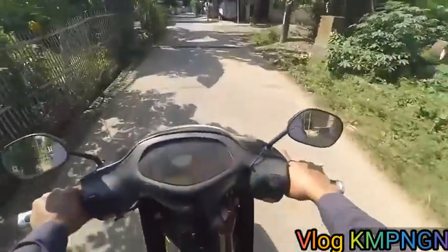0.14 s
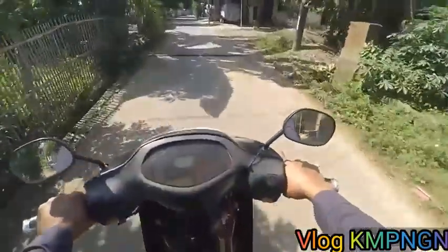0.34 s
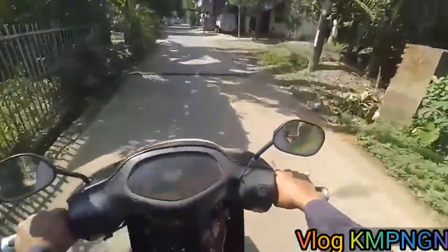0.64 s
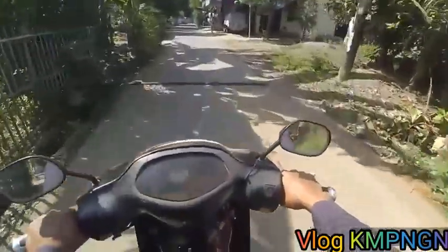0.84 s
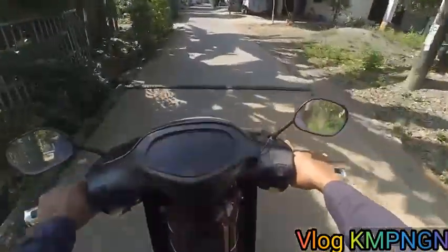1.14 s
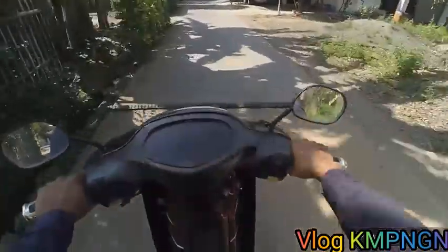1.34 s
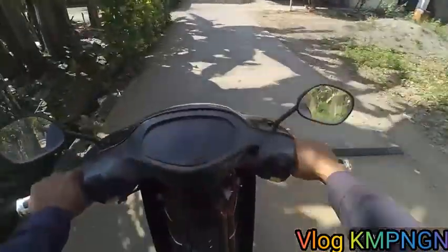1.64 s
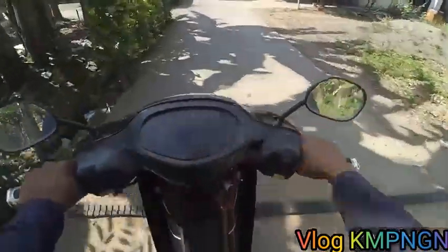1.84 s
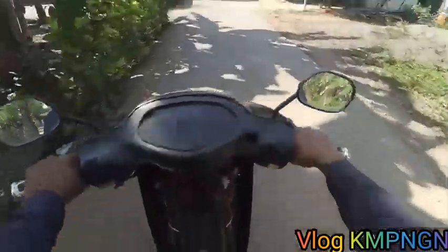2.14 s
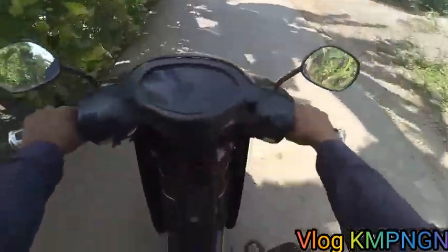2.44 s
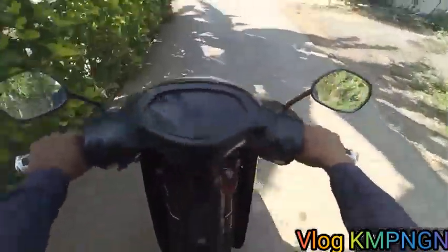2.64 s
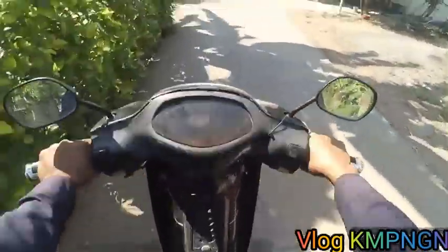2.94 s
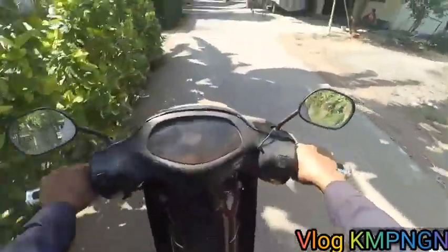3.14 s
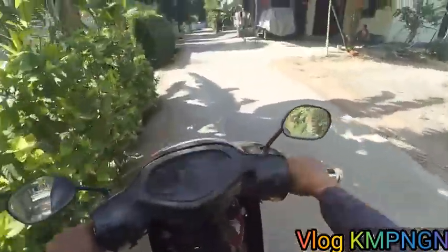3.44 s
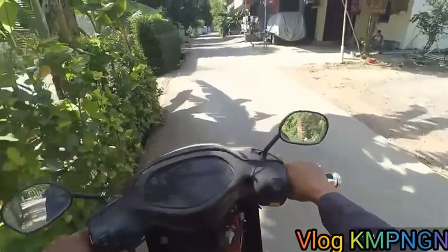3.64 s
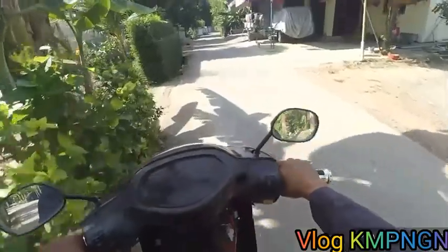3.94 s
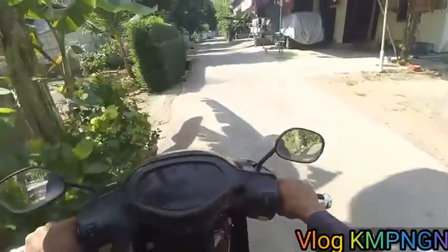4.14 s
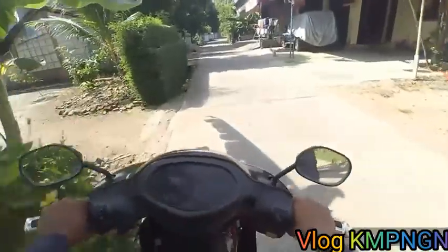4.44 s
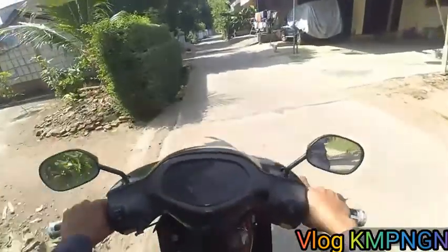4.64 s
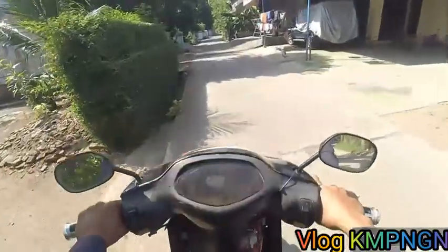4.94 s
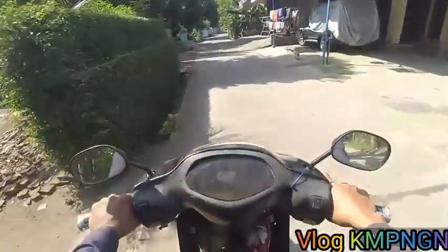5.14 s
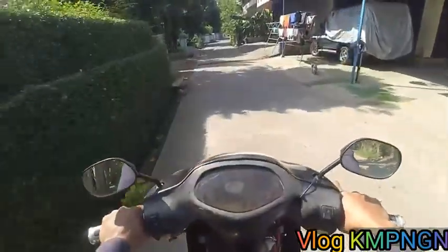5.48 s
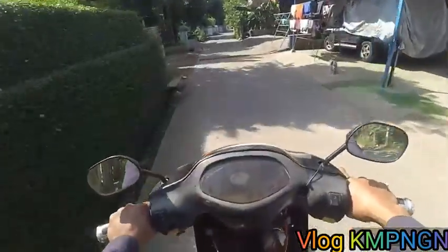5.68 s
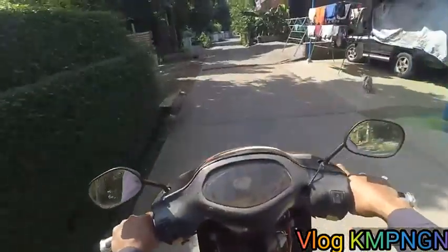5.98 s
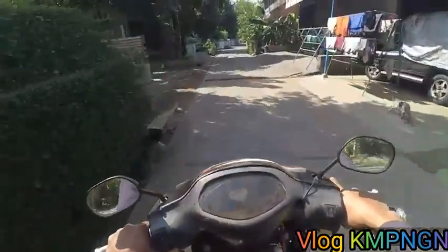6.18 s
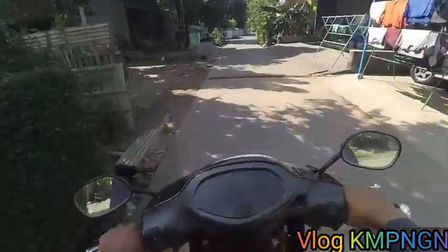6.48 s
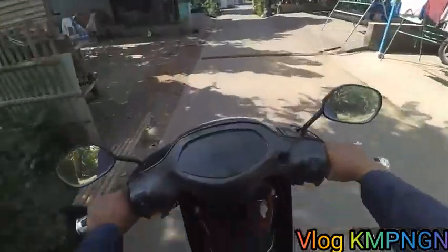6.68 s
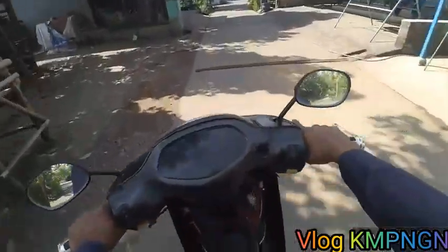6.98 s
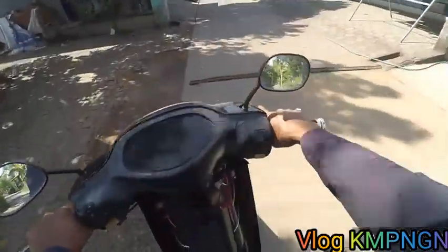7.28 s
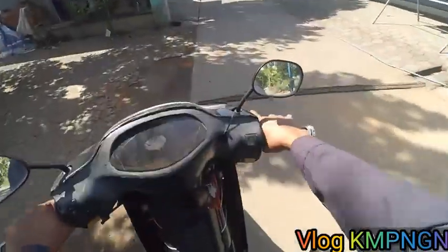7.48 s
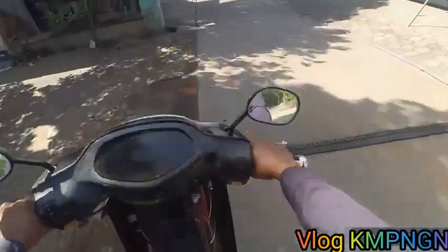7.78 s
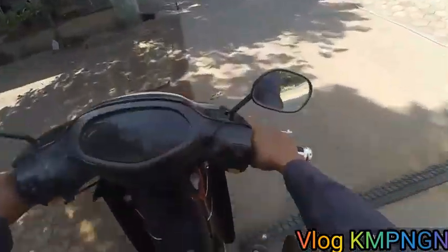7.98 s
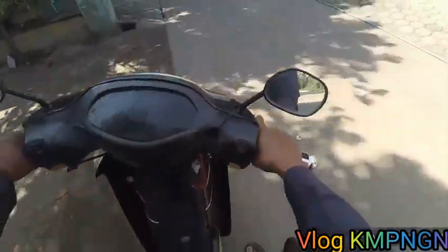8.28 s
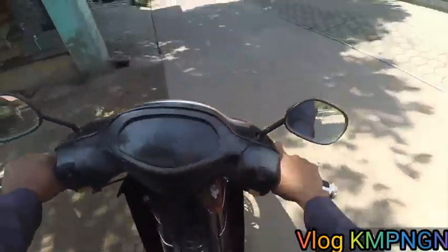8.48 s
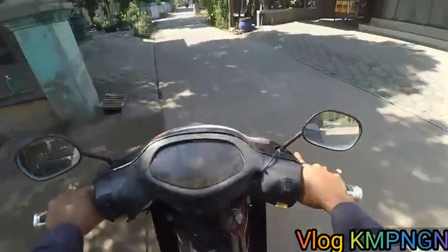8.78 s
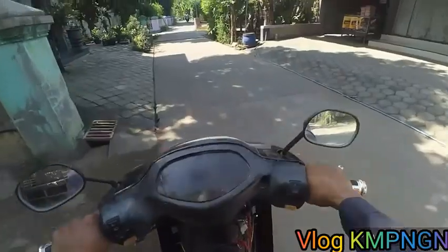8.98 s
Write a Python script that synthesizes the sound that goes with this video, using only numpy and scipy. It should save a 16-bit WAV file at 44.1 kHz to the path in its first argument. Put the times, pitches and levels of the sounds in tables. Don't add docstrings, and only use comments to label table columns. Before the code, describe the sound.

From the rider's chest, a low-speed scooter engine throbs and clatters over tyre hiss, broken by a scrape, a heavy knock and brief chirps.

```python
import sys
import numpy as np
from scipy import signal
from scipy.fft import rfft, irfft, next_fast_len
from scipy.io import wavfile
from scipy.ndimage import uniform_filter1d, map_coordinates

SR = 44100
rng = np.random.default_rng(int(sys.argv[2]) if len(sys.argv) > 2 else 0)


def wrap_up_sound(samples):
    columns = np.atleast_2d(samples).T
    tamed = np.clip(columns, -1, 1)
    steps = np.round(tamed * 32767).astype(np.int16)
    wavfile.write(sys.argv[1], SR, steps)


def invert_db(x):
    u = np.asarray(x, float) / 20
    return 10 ** u


N = 402191

# time_s, firings_per_s
SPEED = [(0.0, 16.1), (0.5, 14.46), (1.0, 11.55), (1.35, 10.5), (1.55, 12.9), (1.83, 20), (2.1, 23.2),
         (2.65, 24.85), (3.6, 24.15), (4.3, 20.7), (4.7, 22.1), (5.05, 20.6), (5.65, 19.75), (6.45, 16.1),
         (7.15, 15.45), (7.52, 14), (8.45, 20.8), (9.12, 21.3)]
# centre_hz, width_hz, level_db
HOUSING = [(990, 86, 3.5), (1249, 83, 3.5), (1559, 56, -3.5), (1785, 22, 1), (2044, 260, -5.5),
           (2387, 105, -1), (2649, 75, 0.5), (3340, 207, -6), (4140, 133, 1), (4760, 205, -11.5),
           (5310, 490, -11.5), (6600, 1780, -16), (9100, 59, -20), (10440, 150, -34)]
# freq_hz, level_db_per_hz
HISS = [(290, -33), (500, -15), (684, -22.5), (1050, -2.5), (1440, -11.5), (2610, -10), (3730, -11.5),
        (4130, -15.5), (4560, -18), (6700, -23), (15100, -45)]


def unit(x):
    return x / np.sqrt(np.mean(x ** 2) + 1e-20)


def curves(rows):
    s, *cols = np.transpose(rows)
    return [np.interp(np.arange(N) / SR, s, c) for c in cols]


def wobble(rate_hz):
    knots = rng.standard_normal(int(N * rate_hz / SR) + 4)
    return map_coordinates(knots, [np.arange(N) * rate_hz / SR])


def filtered(x, response):
    m = next_fast_len(N + SR // 2)
    return irfft(rfft(x, m) * response(np.fft.rfftfreq(m, 1 / SR)), m)[:N]


def resonances(modes):
    def response(f):
        total = 0
        for k, (centre_hz, width_hz, db) in enumerate(modes):
            damping = 1j * f * width_hz
            total = total + (-1) ** k * invert_db(db) * damping / (centre_hz ** 2 - f * f + damping)
        return total
    return response


def colour(points):
    hz, db = np.transpose(points)
    return lambda f: invert_db(np.interp(np.log(f + 1), np.log(hz + 1), db))


def patchy(depth_db):
    z = signal.stft(rng.standard_normal(N), nperseg=512)[2]
    field = uniform_filter1d(rng.standard_normal(z.shape), size=6, axis=0)
    field = uniform_filter1d(field, size=10, axis=1)
    return signal.istft(z * invert_db(depth_db * unit(field)), nperseg=512)[1][:N]


def add(track, s, sound):
    part = track[max(round(s * SR), 0):][:len(sound)]
    part += sound[:len(part)]


def noise_levels():
    # time_s, level_db
    roadside = [(0, -3.5), (.4, -3), (1.2, 0), (1.75, -0.5), (2.5, 1), (4.1, 0.5), (4.9, -0.5), (6, 0.5),
                (7.1, 0), (7.55, -1), (8.2, -0.5), (9.12, -1)]
    cruise_firings_per_s = 20
    faster = curves(SPEED)[0] - cruise_firings_per_s
    walls_db = curves(roadside)[0]
    clatter_db = -44 + 0.63 * faster + walls_db
    air_db = -50 + 0.33 * faster + walls_db
    return clatter_db, air_db


def insects():
    # start_s, end_s, pitch_hz, width_hz, level_db
    buzzes = [
        (0, .4, 7230, 504, -64.5),
        (4.15, 4.8, 8600, 346, -66.5),
        (4.204, 4.9, 6600, 498, -60),
        (4.301, 4.996, 5592, 294, -61),
        (5.897, 6.501, 7553, 495, -66),
        (6.305, 6.606, 7060, 707, -59),
        (6.788, 7.697, 7140, 602, -59),
        (6.802, 7.1, 8700, 300, -70),
        (7.2, 7.694, 6470, 252, -67),
        (8.626, 8.857, 4220, 1906, -47),
    ]
    out, pulsing = np.zeros(N), invert_db(3 * wobble(14) + 2.5 * wobble(45))
    for start, end, hz, width_hz, db in buzzes:
        t = np.arange(round((end - start) * SR)) / SR
        flicker = map_coordinates(rng.standard_normal(SR // 4), [t * width_hz * 2])
        swell = np.sin(np.pi * t / (end - start))
        add(out, start, invert_db(db + 2.5) * swell * flicker * np.sin(2 * np.pi * hz * t))
    return out * pulsing


def birds():
    # start_s, length_s, middle_hz, level_db
    plunges = [(5.154, 0.048, 6070, -44.5), (5.189, .025, 4800, -37.5), (5.671, 0.047, 2790, -45)]
    falls = [(2.006, 0.025, 2830, -43), (5.198, 0.0334, 3510, -34.5), (5.228, .06, 3000, -43.5),
             (5.353, 0.0535, 3510, -33), (5.832, 0.062, 2685, -37), (6.497, 0.056, 2710, -43),
             (6.795, 0.019, 4500, -47.5)]
    droops = [(1.72, .1, 5580, -52), (1.975, 0.035, 3380, -44.5), (5.569, 0.0446, 2696, -41.5),
              (6.465, .077, 4880, -56), (6.645, 0.061, 2610, -45.5)]
    arches = [(1.878, 0.1, 3264, -42), (1.956, 0.13, 5250, -57), (3.946, 0.019, 5300, -39),
              (5.776, 0.056, 3393, -36), (5.93, .075, 2660, -47.5), (6.427, .08, 3480, -40),
              (6.451, .035, 3870, -45), (6.692, 0.076, 5020, -54)]
    dips = [(3.227, 0.054, 3530, -43), (3.885, .07, 4604, -38), (5.981, 0.079, 2300, -47)]
    rises = [(5.713, 0.056, 2990, -42), (6.302, 0.21, 3105, -48)]
    flats = [(3.97, .06, 5060, -51), (4.0, .02, 4200, -42), (.121, 0.033, 7220, -58),
             (.225, 0.071, 7210, -65), (.51, 0.24, 7800, -66.5), (4.04, .08, 7780, -61),
             (5.141, 0.041, 3610, -48), (6.13, 0.063, 1848, -53), (6.208, .078, 2445, -50),
             (6.84, 0.12, 3500, -63)]
    shapes = [(plunges, 20, -3), (falls, 9, -5), (droops, 1.5, -5), (arches, -3.5, -3),
              (dips, 7, 2.5), (rises, -6, 7), (flats, .3, .1)]
    song, flutter = np.zeros(N), invert_db(3 * wobble(160) + 1.5 * wobble(40))
    for calls, start_percent, end_percent in shapes:
        for s, length_s, hz1, db in calls:
            hz0, hz2 = hz1 * (1 + start_percent / 100), hz1 * (1 + end_percent / 100)
            u = np.arange(round(length_s * SR)) / (length_s * SR)
            pitch_hz = hz0 * (1 - u) * (1 - 2 * u) + 4 * hz1 * u * (1 - u) + hz2 * u * (2 * u - 1)
            phase = 2 * np.pi * np.cumsum(pitch_hz) / SR
            envelope = np.minimum(u / 0.11, 1) * (1 - u ** 2) ** .5
            whistle = np.sin(phase) + 0.056 * rng.standard_normal(len(u))
            add(song, s, invert_db(db + 2) * envelope * whistle)
            add(song, s + .011, invert_db(db - 8) * np.sin(np.pi * u) * np.sin(1.01 * phase))
    t = np.arange(SR // 2) / SR
    tail = rng.standard_normal(len(t)) * invert_db(-60 * t / 0.32) * (t > .006)
    echoes = signal.fftconvolve(song, tail / np.linalg.norm(tail))[:N]
    return song * flutter + invert_db(-2) * echoes


def air_hiss():
    air_db = noise_levels()[1]
    grit = (rng.random(N) < 120 / SR) * rng.standard_normal(N) * 7
    gusts_db = .6 * wobble(6) + .8 * wobble(18)
    source = patchy(depth_db=1.2) + np.diff(grit, prepend=0)
    return invert_db(air_db + 3.5 + gusts_db) * unit(filtered(source, colour(HISS)))


def tyre_rumble():
    # freq_hz, level_db_per_hz
    spectrum = [(15, -6), (33, 0), (48, -16), (130, -25), (220, -32), (310, -24), (400, -32), (700, -38),
                (1100, -60)]
    level_db = .3 * noise_levels()[0] - 29 + 1.5 * wobble(5)
    return invert_db(level_db) * unit(filtered(patchy(depth_db=2), colour(spectrum)))


def road_joints():
    # time_s, pitch_hz, level_db, t60_s
    joints = [
        (0.019, 104.4, -34, 0.33),
        (1.802, 108, -27.5, 0.38),
        (3.6, 98.1, -34, .4),
        (5.3, 94, -22, 0.58),
        (7.08, 95.3, -26.5, 0.39),
        (8.85, 91.6, -38, 0.38),
        (9.03, 124.4, -28.5, 0.46),
        (9.05, 245, -37, 0.24),
    ]
    thumps, t = np.zeros(N), np.arange(SR) / SR
    for s, hz, db, t60_s in joints:
        envelope = invert_db(db - 60 * t / t60_s) * (1 - np.exp(-t / 0.033))
        add(thumps, s, envelope * np.sin(2 * np.pi * hz * t))
    return thumps


def knock():
    # level_db, pitch_hz, t60_s
    frame = [(-18.5, 72, 0.25), (-25.5, 89, 0.25), (-20.5, 152, 0.11), (-25, 220, .05), (-15.5, 258, 0.055),
             (-39, 160, 0.11), (-25, 437, 0.033), (-21.5, 803, 0.034), (-33, 1600, 0.012)]
    # time_s, level_db, pitch_hz, settling_s
    swing = (1.463, -2.8, 21.8, .165)
    out, t = np.zeros(N), np.arange(SR) / SR
    for db, hz, t60_s in frame:
        envelope = invert_db(db - 60 * t / t60_s) * (1 - np.exp(-t / 0.00085))
        add(out, 1.472, envelope * np.sin(2 * np.pi * hz * t))
    s, db, hz, settling_s = swing
    add(out, s, invert_db(db) * np.exp(-(t / settling_s) ** 3) * np.sin(2 * np.pi * hz * t))
    return out


def handling():
    # time_s, peak_db
    taps = [(0.762, -23), (0.81, -12), (0.837, -11.5), (0.857, -27), (1.352, -20), (3.825, -25),
            (3.872, -29), (3.909, -28), (4.005, -33), (5.191, -31), (5.365, -23), (6.158, -32)]
    # time_s, peak_db
    thuds = [
        (1.396, -35),
        (1.453, -30),
        (1.463, -30),
        (1.472, -21.5),
        (1.483, -32.5),
        (1.498, -36),
    ]
    # start_s, top_s, end_s, level_db
    scrapes = [
        (0.647, 0.665, 1, -43.5),
        (0.757, 0.83, 0.899, -30.5),
    ]
    bursts, t = np.zeros(N), np.arange(SR // 4) / SR
    # hits, t60_s, brightness -1..1
    for hits, t60_s, bright in [(taps, 0.043, 0.22), (thuds, .03, -.8)]:
        pole = [1, bright]
        for s, db in hits:
            tilted = unit(signal.lfilter([1], np.convolve(pole, pole), rng.standard_normal(len(t))))
            add(bursts, s, invert_db(db - 60 * t / t60_s) * (1 - np.exp(-t / 0.0012)) * tilted)
    for start, top, end, db in scrapes:
        u = np.arange(round((end - start) * SR)) / SR
        pressure = np.interp(u, [0, top - start, end - start], [0, 1, 0])
        add(bursts, start, invert_db(db) * pressure ** .5 * rng.standard_normal(len(u)))
    shell, airy = resonances(HOUSING), colour(HISS)
    body = lambda f: shell(f) + invert_db(-13) * airy(f) + invert_db(-8.5) / (1 + (f / 600) ** 4)
    return invert_db(9) * filtered(bursts, body)


def mount_sway():
    # time_s, peak_db, pitch_hz
    jolts = [(0.189, -22.5, 21.8), (0.461, -22, 25.2), (.89, -6.5, 22.6), (1.06, -10.5, 23.6),
             (1.302, -14.5, 23), (1.98, -24, 25), (2.248, -17, 21.3), (2.61, -26, 26), (2.859, -18.5, 22.5),
             (4.169, -19, 22.7), (4.35, -21.5, 20.5), (4.501, -18.5, 20.8), (4.81, -21.5, 28.2),
             (5.461, -19.5, 31.8), (5.712, -27, 28), (6.25, -20, 27), (6.561, -17, 22.5),
             (6.662, -8.5, 26.8), (7.182, -16.5, 27.8), (7.46, -24, 26.7), (8.018, -19.5, 26.5),
             (8.32, -24, 30), (8.631, -27, 29), (8.87, -30, 24), (9.02, -25, 23.2)]
    # time_s, peak_db
    lurches = [
        (0.451, -19.5),
        (0.721, -16.5),
        (0.869, -13),
        (1.1, -16),
        (1.378, -11),
        (1.8, -25),
        (5.1, -25),
        (7.0, -34),
        (7.17, -19),
    ]
    t = np.arange(N) / SR

    def swing(s, db, hz, length_s):
        return invert_db(db) * np.exp(-((t - s) / length_s) ** 2) * np.sin(2 * np.pi * hz * (s - t))

    bumps = sum(swing(s, db, hz, 0.035) for s, db, hz in jolts)
    bumps = bumps + sum(swing(s, db, 8.6, 0.073) for s, db in lurches)
    shake = lambda f: resonances([(26, 14, 0)])(f) ** 2 / (1 + (f / 40) ** 8)
    tremble = invert_db(-30.5) * unit(filtered(rng.standard_normal(N), shake))
    heave = invert_db(-37.5) * unit(filtered(rng.standard_normal(N), resonances([(8.2, 2.5, 0)])))
    return bumps + tremble + heave


def engine_shake(cycle, throttle):
    # time_s, level_db
    grip = [(0, -6.5), (.35, -15), (.5, 1), (6.93, 1.5), (7.02, -11), (7.12, 1.5), (9.12, -5.5)]
    mount_hz, mount_width_hz, mount_top_hz = 32.6, 9, 36.56
    crank_hz = 2 * curves(SPEED)[0]
    passed = 1 / np.sqrt(1 + ((crank_hz - mount_hz) / mount_width_hz) ** 2)
    passed = passed / (1 + (crank_hz / mount_top_hz) ** 24)
    through_mount = invert_db(-23 + curves(grip)[0] + 4.5 * wobble(5)) * passed
    through_frame = invert_db(-40.5) * throttle ** 2
    crank = (through_mount + through_frame) * np.sin(4 * np.pi * cycle + 0.21 * wobble(4.2))
    stroke_level = invert_db(-27 + 0.83 * wobble(6)) * throttle ** 2 * (crank_hz / 48) ** 4
    return crank + stroke_level * np.sin(2 * np.pi * cycle)


def clatter(cycle):
    # centre_hz, width_hz, level_db
    covers = [(2604, 95, -4), (2044, 25, -1.5), (996, 93, -3.5)]
    ticks = (rng.random(N) < 1500 / SR) * rng.standard_normal(N) * invert_db(2.5 * rng.exponential(size=N))
    seated = np.flatnonzero(np.diff(np.floor(2 * cycle + .3)))
    valves = np.bincount(seated, invert_db(3.4 * rng.standard_normal(len(seated))), N)
    rush = unit(patchy(depth_db=1.6))
    beat = 1 + 0.16 * np.cos(4 * np.pi * cycle) + 0.11 * np.cos(2 * np.pi * cycle)
    swell = invert_db(.5 * wobble(7) + 1.1 * wobble(25))
    drive = beat * swell * (rush + 0.39 * unit(ticks) + 4.3 * valves)
    kicked = 1 + np.cos(2 * np.pi * cycle - .5) ** 3
    slaps = (rng.random((3, N)) < 45 * kicked ** 2 / 1.3 / SR) * rng.standard_normal(N)
    rattle = sum(filtered(slaps[k], resonances([mode])) for k, mode in enumerate(covers))
    ringing = unit(filtered(drive, resonances(HOUSING))) + .44 * unit(rattle)
    return invert_db(noise_levels()[0] - 1.5) * ringing


def exhaust(cycle, exhaust_db, throttle):
    # centre_hz, width_hz, level_db
    pipe_modes = [(70, 45, 1), (135, 40, 2.5), (248, 28, -14.5), (313.4, 35, -7), (487.6, 14, -4.5)]
    # centre_hz, width_hz, level_db
    bark_modes = [(212, 60, -2), (248, 30, 1), (318, 28, -8), (385, 40, -4), (478, 55, -1)]
    fired = np.flatnonzero(np.diff(np.floor(cycle)))
    chance = rng.standard_normal((len(fired), 3))
    ragged = 1 - throttle[fired]
    late_s = chance[:, 0] * (.0001 + .0007 * ragged)
    at = np.clip(fired + late_s * SR, 0, N - 1).astype(int)
    pulses = np.bincount(at, invert_db(exhaust_db[at] + chance[:, 1] * (.5 + 2 * ragged)), N)
    pulses = pulses + (.05 + .42 * throttle) * np.roll(pulses, round(.0054 * SR))
    pipe = lambda f: resonances(pipe_modes)(f) / (1 + 1j * f / 200) ** 2
    strength = np.sqrt(SR / 20 / np.sum(filtered(np.arange(N) == 0, pipe) ** 2))
    boom = invert_db(1) * filtered(pulses, pipe)
    load = np.clip((exhaust_db + 45.5) / 4, 0, 1)
    tighter = lambda f: invert_db(-15) * resonances(bark_modes)(f) - .45 * pipe(f) / (1 + (f / 108) ** 8)
    bark = filtered(load * pulses, tighter)
    coasting = (1 - throttle) * np.clip((curves(SPEED)[0] - 14) / 6, 0, 1)
    pops = filtered(coasting * pulses, resonances([(200, 90, -14)]))
    return strength * (boom + bark + pops)


def engine():
    # time_s, level_db, throttle_0_to_1
    drive = [(0, -49, .2), (.6, -52, .1), (1.3, -54, 0), (1.6, -46, .5), (1.85, -42, .9), (2.3, -41, 1),
             (4.1, -42, 1), (4.35, -46, .7), (4.85, -46, .6), (5.05, -43.5, .25), (5.7, -43.5, .2),
             (6.3, -45.5, .1), (7, -47, .2), (7.5, -47, .4), (7.9, -44.5, .8), (8.3, -44, 1),
             (9.12, -43.5, 1)]
    cycle = np.cumsum(curves(SPEED)[0]) / SR + .59
    exhaust_db, throttle = curves(drive)
    return engine_shake(cycle, throttle) + clatter(cycle) + exhaust(cycle, exhaust_db, throttle)


def scene():
    hedges = insects() + birds()
    road = air_hiss() + tyre_rumble() + road_joints()
    mono = hedges + road + knock() + handling() + mount_sway() + engine()
    drift = invert_db(-60) * unit(filtered(rng.standard_normal(N), lambda f: 1 / (1 + (f / 30) ** 2)))
    return np.array([mono + drift, mono - drift])


def low_pass(x):
    return signal.sosfilt(signal.butter(12, 15250, fs=SR, output="sos"), x)


def record(dry):
    rounded = dry / (1 + np.abs(dry / .95) ** 12) ** (1 / 12)
    return low_pass(rounded)


dry = scene()
out = record(dry)
wrap_up_sound(out)
```